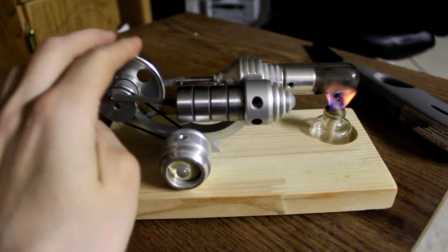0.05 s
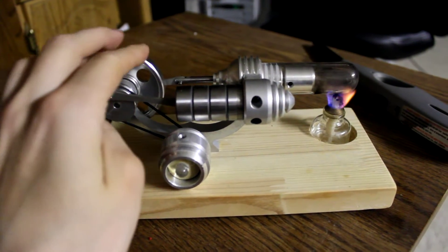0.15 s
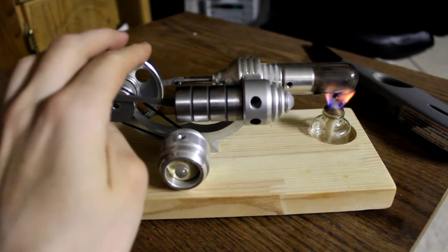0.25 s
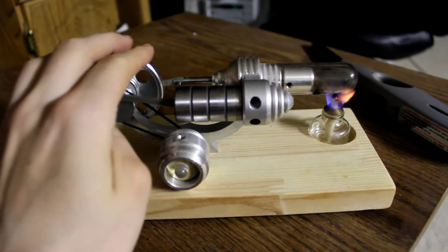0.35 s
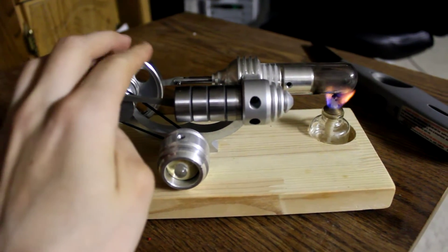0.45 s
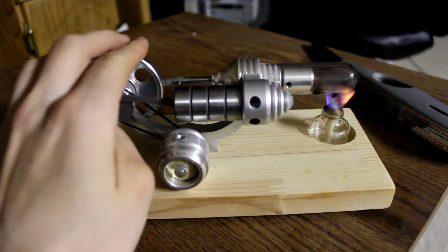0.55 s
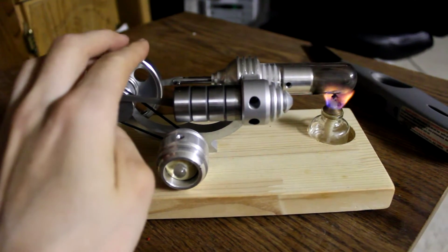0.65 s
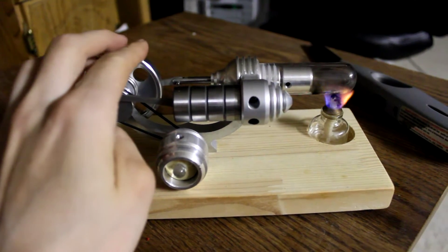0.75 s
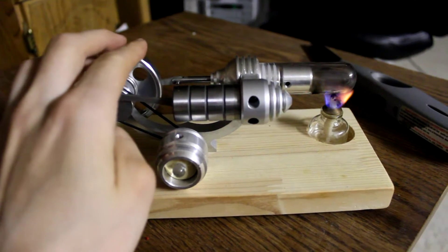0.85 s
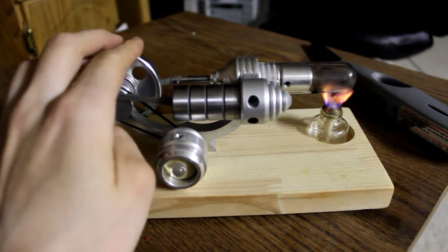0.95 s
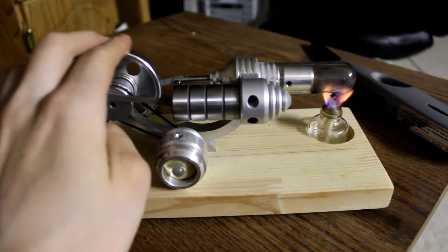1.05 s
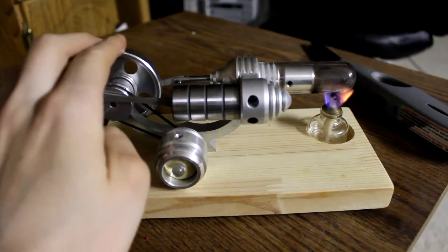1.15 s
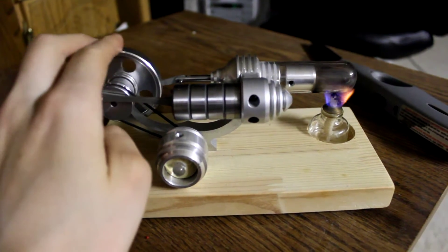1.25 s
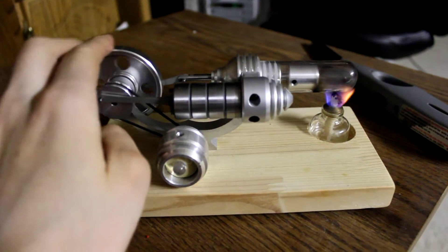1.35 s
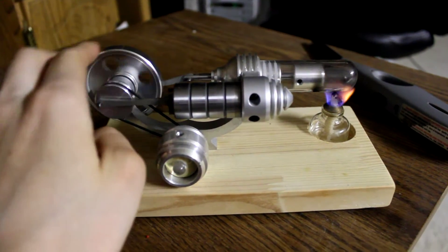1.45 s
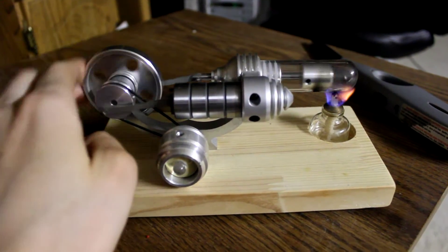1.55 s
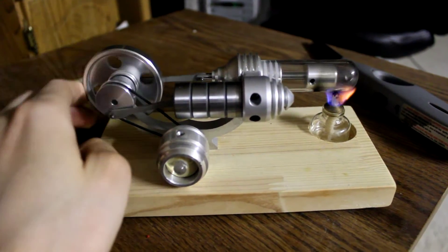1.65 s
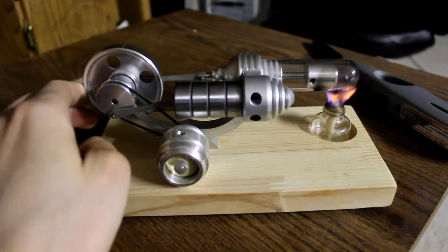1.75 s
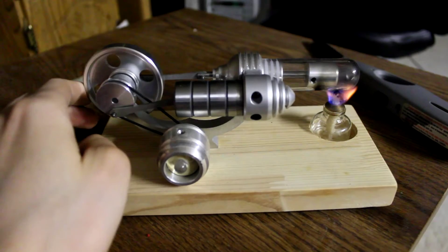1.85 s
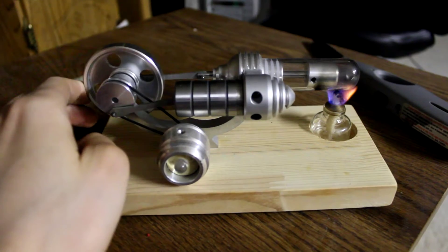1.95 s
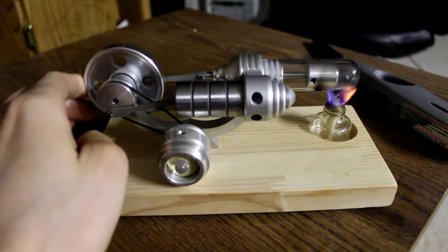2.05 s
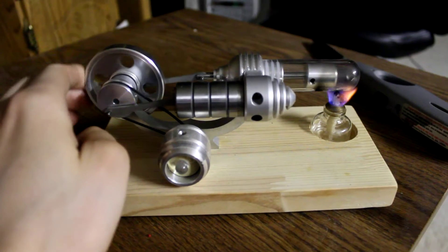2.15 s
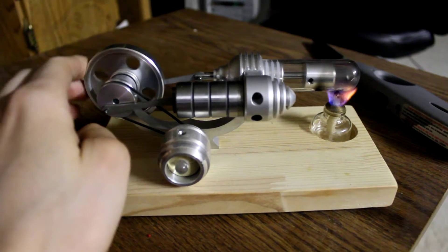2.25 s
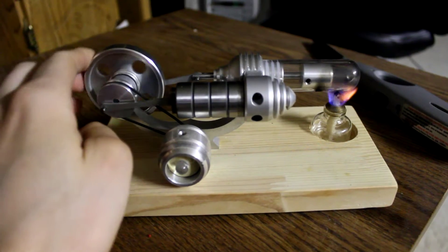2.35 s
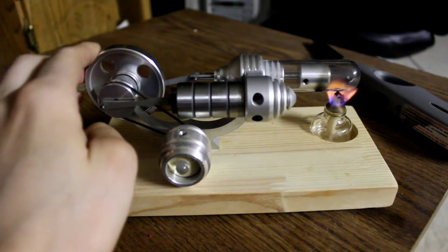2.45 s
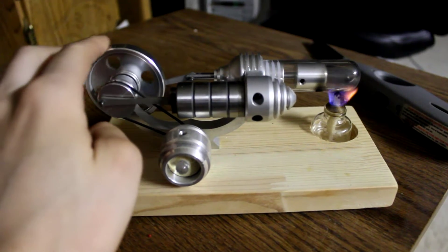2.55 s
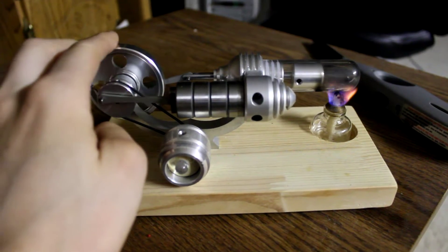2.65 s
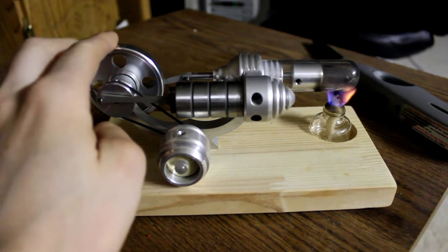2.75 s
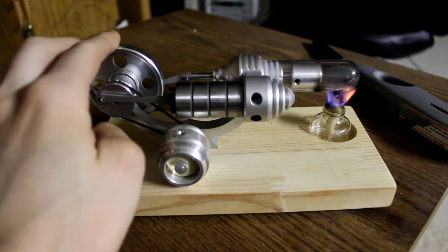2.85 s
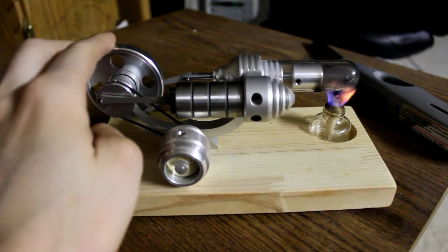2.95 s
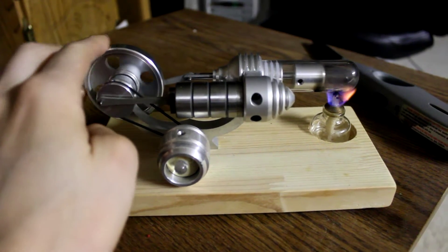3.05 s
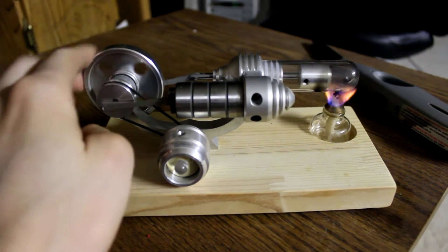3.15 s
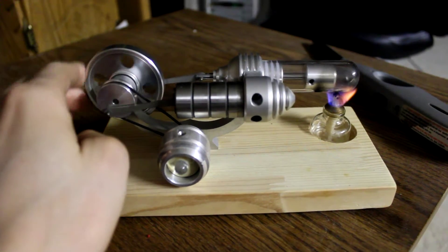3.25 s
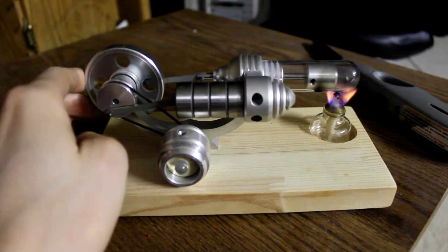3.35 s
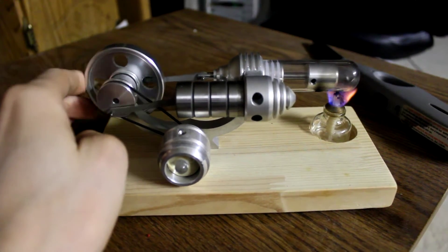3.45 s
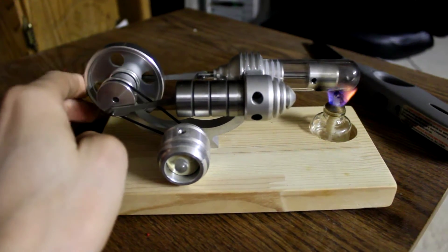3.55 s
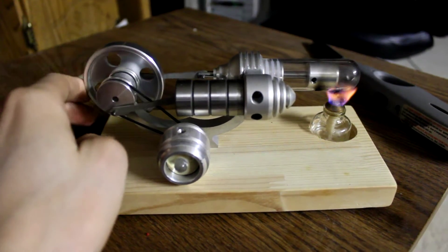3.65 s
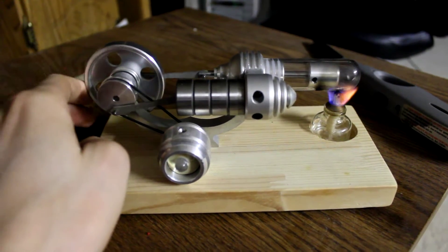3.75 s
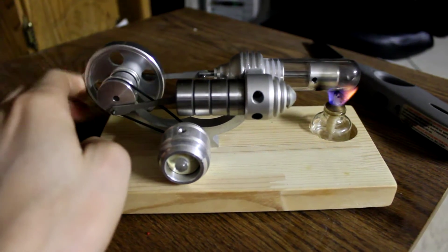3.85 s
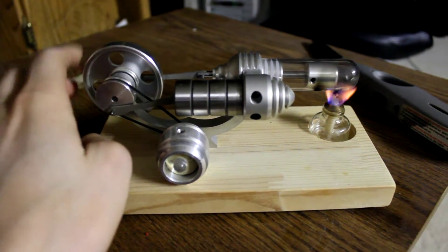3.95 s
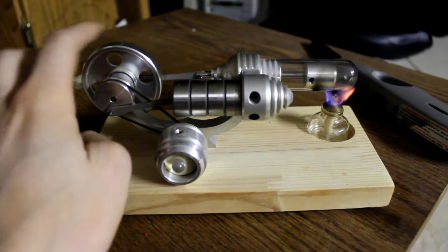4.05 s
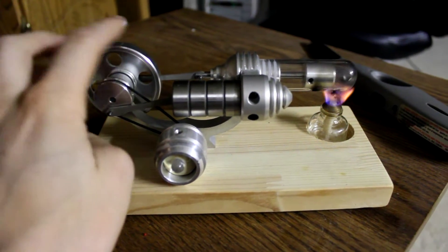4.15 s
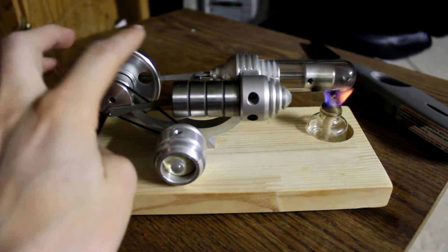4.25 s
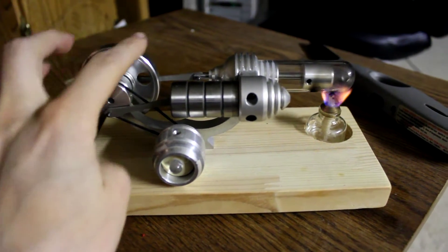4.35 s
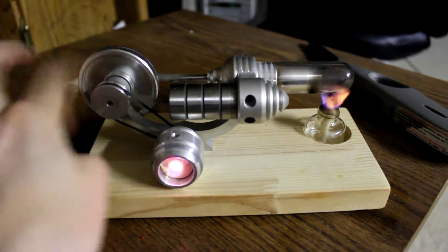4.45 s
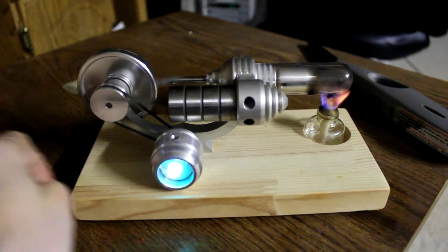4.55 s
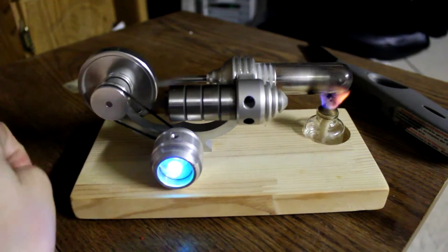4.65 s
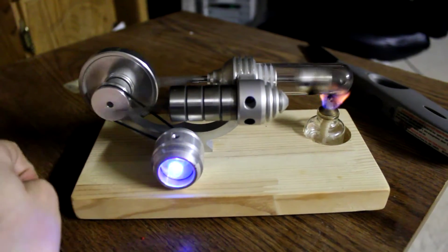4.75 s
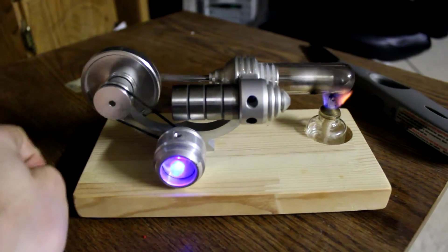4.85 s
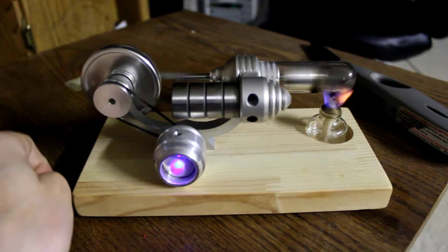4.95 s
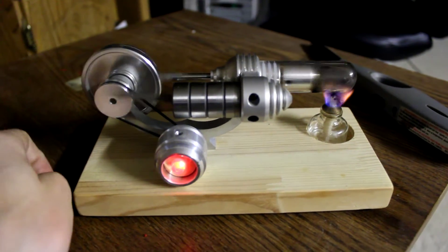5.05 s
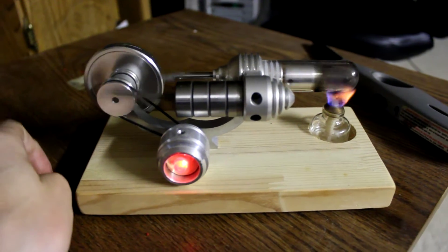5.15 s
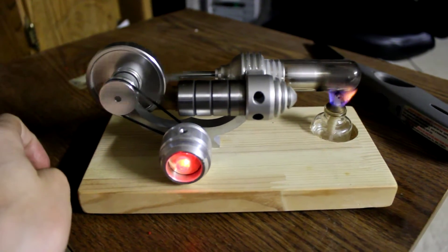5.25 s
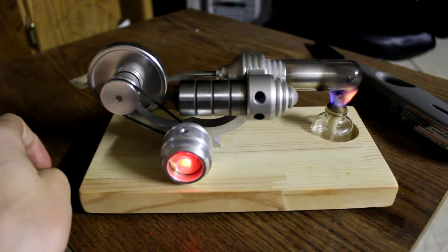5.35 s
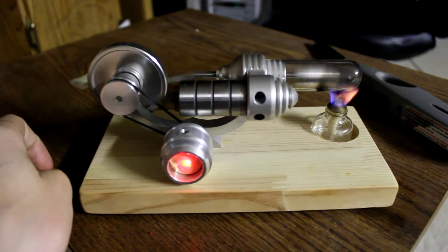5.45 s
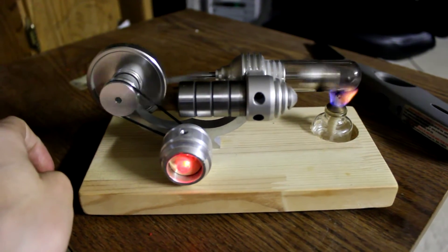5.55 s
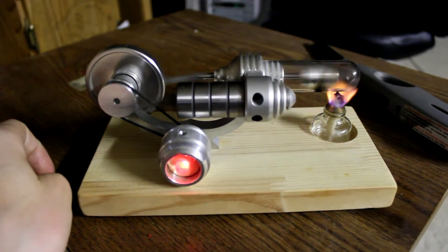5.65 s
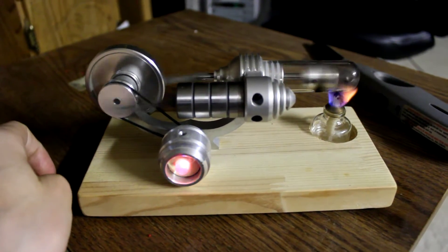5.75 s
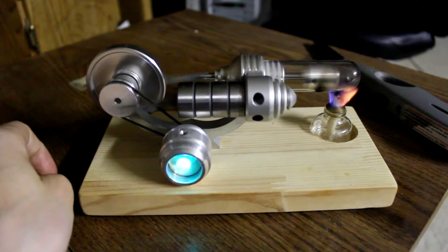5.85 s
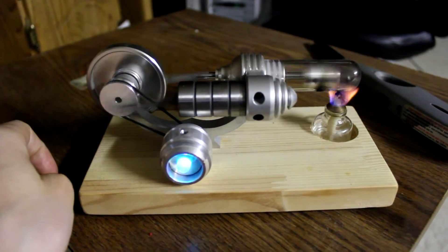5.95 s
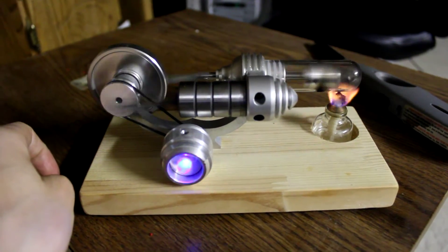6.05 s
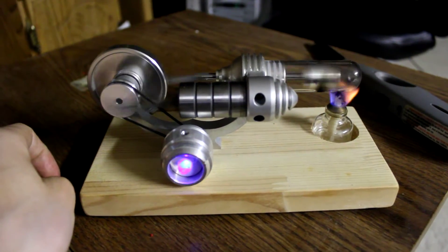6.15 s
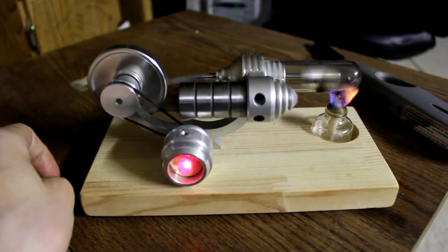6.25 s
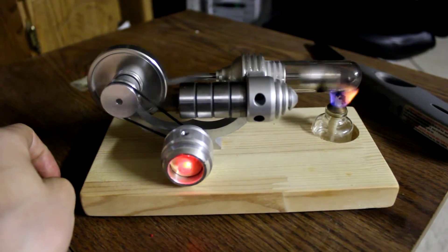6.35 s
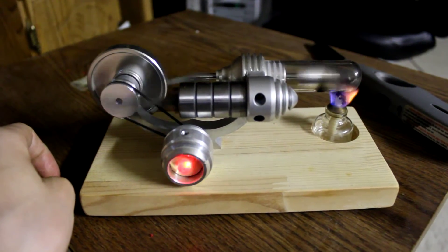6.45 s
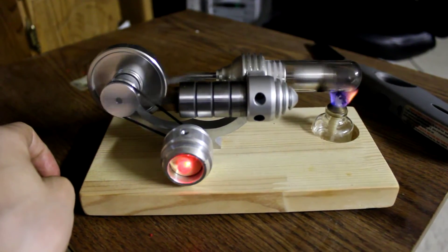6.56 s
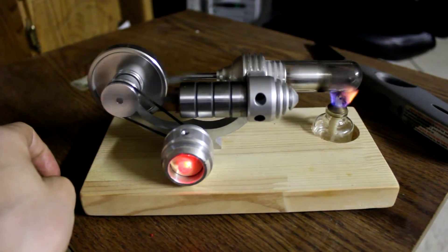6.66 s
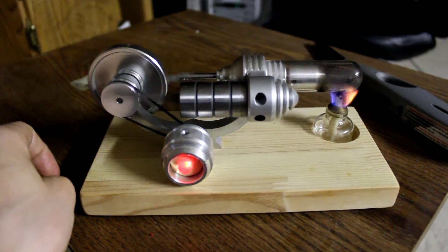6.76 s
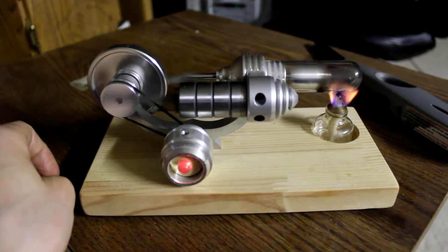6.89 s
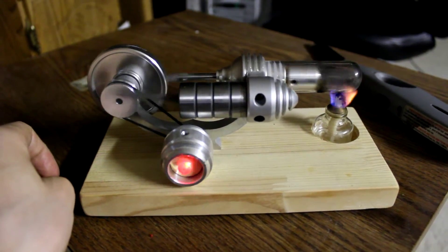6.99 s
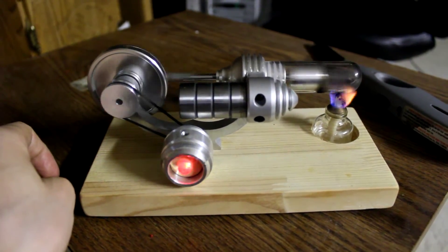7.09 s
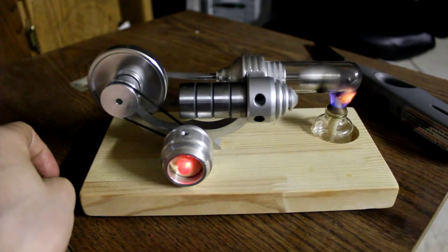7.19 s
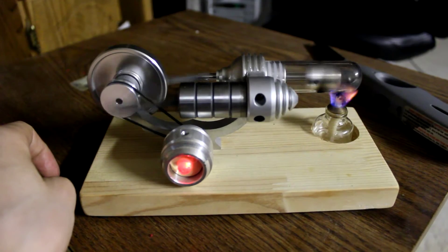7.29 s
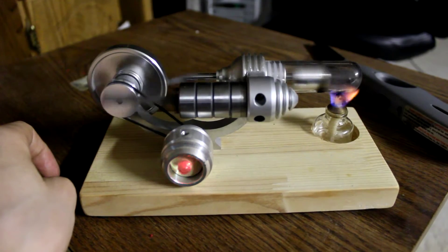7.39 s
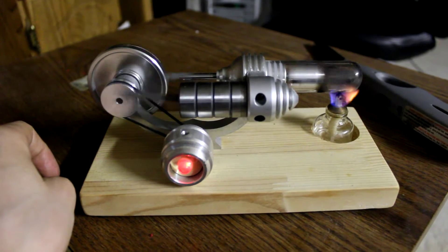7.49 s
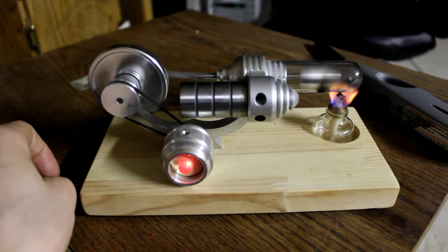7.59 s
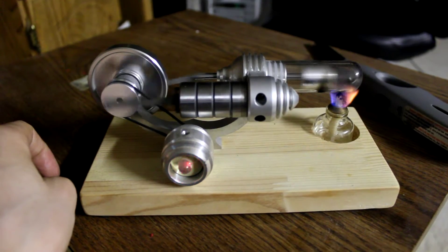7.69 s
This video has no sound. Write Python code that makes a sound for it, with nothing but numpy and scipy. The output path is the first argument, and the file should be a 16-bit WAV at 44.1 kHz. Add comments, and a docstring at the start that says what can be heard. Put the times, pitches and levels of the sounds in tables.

```python
"""A model hot-air engine

The engine stands on its wooden base on a table, in a quiet room with a faint mains hum. Fingers turn
the flywheel to and fro, so the loose linkage clicks; then a flick starts it and it runs, slowly losing
speed. The slack in the rods knocks twice a turn: hard on the forward stroke, softer but with a strong
bounce on the back stroke. The pistons slide and shake the table, and the flywheel sings thinly."""
import sys
import numpy as np
from scipy import signal
from scipy.fft import rfft, irfft
from scipy.io import wavfile
from scipy.ndimage import uniform_filter1d

SR = 44100
rng = np.random.default_rng(int(sys.argv[2]) if len(sys.argv) > 2 else 0)


def wav_record(signal):
    """Record a signal, one row per channel, as 16-bit PCM in the file named by sys.argv[1]."""
    frames = np.transpose(np.atleast_2d(signal))
    bounded = np.clip(frames, -1, 1)
    # unit amplitude maps onto the largest positive 16-bit level
    quanta = np.round(bounded * 32767).astype(np.int16)
    wavfile.write(sys.argv[1], SR, quanta)


N = 340669
TIME = np.arange(N) / SR
BLOW_SAMPLES = 4096
BLOW_HZ = np.maximum(np.fft.rfftfreq(BLOW_SAMPLES, 1 / SR), 1)
RUN_START_S, CRUISE_TURNS_PER_S = 4.5209, 10


def from_db(db):
    """Turn decibels into a gain."""
    return 10 ** (np.asarray(db) / 20)


def rms_one(x):
    """Scale a sound to an average (RMS) level of one."""
    return x / np.sqrt(np.mean(x ** 2) + 1e-20)


def at_hz(points, hz):
    """Read between rows of (Hz, value), along straight lines over log frequency."""
    where, value = np.transpose(points)
    return np.interp(np.log(np.maximum(hz, 1)), np.log(where), value)


def at_time(points, s):
    """Read between rows of (seconds, value), along straight lines."""
    return np.interp(s, *np.transpose(points))


def filtered(x, hz, kind, order=2):
    """Keep the lows, the highs or a band of a sound."""
    return signal.sosfilt(signal.butter(order, hz, kind, fs=SR, output="sos"), x)


def add(out, s, sound):
    """Lay a sound into the track at s seconds."""
    start = round(s * SR)
    out[start:start + len(sound)] += sound[:N - start]


def causal(gain):
    """A filter with these gains that makes no sound before the blow (minimum phase)."""
    cepstrum = irfft(np.log(gain))
    half = BLOW_SAMPLES // 2
    return np.exp(rfft(cepstrum * np.r_[1, 2 * np.ones(half - 1), np.zeros(half)]))


def ringing(force, modes):
    """A force sets off tones that die away."""
    t = TIME[:SR // 4]
    ring = sum(from_db(db - 60 * t / t60) * np.sin(2 * np.pi * hz * t) for hz, t60, db in modes)
    return signal.fftconvolve(force, ring)[:N]


# The tone of the room's hiss. Each row: frequency in Hz, relative level in dB.
HISS_SPECTRUM = [(25, -30), (60, -17), (110, -5), (160, -9.5), (290, -4.5), (450, -4), (650, -6),
                 (1000, -4.5), (2000, -8), (5000, -12.5), (9000, -19), (15000, -32.5)]


def still_room(hiss_db, hum_hz, hum_db):
    """An even hiss and a mains hum."""
    colour = from_db(at_hz(HISS_SPECTRUM, np.fft.rfftfreq(N, 1 / SR)))
    hiss = irfft(rfft(rng.standard_normal(N)) * colour, N)
    hum = np.sin(2 * np.pi * hum_hz * TIME)
    return from_db(hiss_db) * rms_one(hiss) + from_db(hum_db) * rms_one(hum)


# How long the room echoes. Each row: frequency in Hz, seconds to fade by 60 dB.
ECHO_FADE = [(150, 0.93), (600, 0.042), (2000, 0.12), (5000, 0.076), (13000, 0.037)]


def room_echo(x, low_db, mid_db, high_db, top_db, build_s):
    """Reflections from table and walls build up and die away; the bass lasts longest."""
    t = TIME[:SR // 2]
    edges = np.geomspace(80, 16000, 11)
    tail = 0
    for low, high in zip(edges, edges[1:]):
        hz = np.sqrt(low * high)
        envelope = from_db(-60 * t / at_hz(ECHO_FADE, hz)) * (1 - np.exp(-(t / build_s) ** 2))
        band = filtered(rng.standard_normal(len(t)) * envelope, [low, high], "band")
        echo_db = at_hz([(500, low_db), (1800, mid_db), (5000, high_db), (12000, top_db)], hz)
        tail = tail + band / np.linalg.norm(band) * np.sqrt(2 * (high - low) / SR) * from_db(echo_db)
    return signal.fftconvolve(x, tail)[:N]


# The low tones of base and table. Each row: pitch in Hz, seconds to fade by 60 dB, relative level in dB.
TABLE_TONES = [(137, 0.13, -7), (233, 0.091, -8), (291.5, 0.14, 1)]
# How hard they are shaken. Each row: time in seconds, relative level in dB.
TABLE_SHAKE = [(4.55, -45), (4.8, -42.5), (4.92, -48.5), (6.4, -46), (6.65, -49.5), (7.1, -48), (7.7, -41)]


def table_thump(thump_db, forward_db, spread_db, delay_s, push_hz, bass_hz):
    """Each stroke shoves the base against the table, the back stroke harder than the forward one."""
    pushes, run = np.zeros(N), strokes()
    for (s, back), chance in zip(run, rng.standard_normal(len(run))):
        add(pushes, s + delay_s, from_db([forward_db * (1 - back) + spread_db * chance]))
    soft_pushes = filtered(filtered(pushes, push_hz, "low"), bass_hz, "high")
    sound = ringing(soft_pushes, TABLE_TONES)
    sound = filtered(sound, 122, "high", order=8)   # the thump carries no deep bass
    return sound / np.std(sound[TIME > RUN_START_S]) * from_db(at_time(TABLE_SHAKE, TIME) + thump_db)


# Where the base and metal parts ring. Each row: pitch in Hz, width in Hz, relative level in dB.
BODY_RESONANCES = [(296.6, 53, -10.5), (564, 58.4, 2), (623, 194, -3), (922.4, 118, -3), (1032, 67, -3.5),
                   (1255, 103, -2), (1406, 65, -16), (1487, 770, -7), (1770, 430, -4.5), (1820, 100, -15),
                   (2176, 183, 0), (2314, 31, -4.5), (2740, 230, -14.5), (3220, 1200, -16),
                   (3738, 270, 3.5), (3950, 870, -1), (4975, 530, -0.5), (5390, 140, -4), (5830, 720, -8),
                   (6990, 630, -5.5), (8060, 1000, -18.5), (10080, 1500, -19), (11400, 8400, -30),
                   (14070, 590, -22.5)]


def body(damping=1, spread_db=0):
    """The engine's body as a filter; spread_db lets each contact ring it a little differently."""
    strengths = from_db(spread_db * rng.standard_normal(len(BODY_RESONANCES)))
    power = sum((from_db(db) * strength) ** 2 / (1 + (2 * (BLOW_HZ - hz) / (width * damping)) ** 2) ** 2
                for (hz, width, db), strength in zip(BODY_RESONANCES, strengths))
    return causal(np.sqrt(power))


def through_body(x):
    """A rubbing force, heard through the engine's body."""
    return signal.fftconvolve(x, irfft(body()))[:N]


# Fingers rolling the wheel. Each row: peak time in seconds, level in dB, rise and fall in seconds.
FINGER_SCUFFS = [(0.353, -40, 0.0071, 0.0085), (1.051, -44, 0.011, 0.044), (2.08, -58, 0.054, 0.02),
                 (3.048, -41, 0.0077, 0.042), (3.255, -58, 0.017, 0.054), (3.879, -41, 0.011, 0.019),
                 (4.063, -46.5, 0.017, 0.023)]


def finger_scuffs(dull_hz):
    """Skin drags on the rim: short, dull swells of friction."""
    rubbing = through_body(rng.standard_normal(N))
    dull = filtered(filtered(rubbing, dull_hz, "low"), dull_hz, "low")
    swells = sum(from_db(db) * np.exp(-np.maximum((s - TIME) / rise, (TIME - s) / fall))
                 for s, db, rise, fall in FINGER_SCUFFS)
    return rms_one(dull) * swells


def piston_slide(cruise_db, db_per_speed, swing_db, grain_db, lag_rad, onset_s):
    """Gritty friction that grows with speed and swells and fades with each stroke."""
    grit = rng.standard_normal(N) * from_db(grain_db * np.minimum(rng.exponential(1, N), 6))
    db = cruise_db + at_time(ENGINE_EFFORT, TIME) + db_per_speed * (speed(TIME) - CRUISE_TURNS_PER_S)
    db += swing_db * np.cos(stroke_angle() - lag_rad)
    fade_in = np.clip((TIME - FLICK_KNOCKS[0][0]) / onset_s, 0, 1) ** 2
    return rms_one(through_body(grit)) * from_db(db) * fade_in


# The wheel's ring swells and fades. Each row: time in seconds, relative level in dB.
WHEEL_SWELL = [(4.55, -13), (4.92, 1.5), (5.3, -2), (5.78, 3), (6.2, -1.5), (6.69, -1), (6.87, 4.5),
               (7.15, -12), (7.7, 5)]
# Fingers catch the rim and set it singing. Each row: start in seconds, level in dB.
WHEEL_TOUCHES = [(0.1, -59), (3.88, -53)]


def flywheel_ring(shaking, hz, t60_s, sing_db, lag_rad):
    """The wheel stores the blows' energy and rings; its still spots sweep past, so the tone throbs."""
    decay, step = from_db(-60 / (t60_s * SR)), 2 * np.pi * hz / SR
    ring = signal.lfilter([np.sin(step)], [1, -2 * decay * np.cos(step), decay ** 2], shaking + 1e-18)
    even_tone = ring / np.sqrt(np.abs(uniform_filter1d(ring ** 2, size=8000)) + 1e-6)
    drive = shaking * from_db(at_time(WHEEL_SWELL, TIME) + sing_db) * (TIME > FLICK_KNOCKS[0][0])
    energy_in = (1 - decay ** 2) * drive ** 2
    for s, db in WHEEL_TOUCHES:
        add(energy_in, s, from_db([db]) ** 2)
    stored = signal.lfilter([1], [1, -decay ** 2], energy_in)
    return even_tone * np.sqrt(stored) * np.cos(stroke_angle() - lag_rad)


# The five parts of a blow: base, frame, rods, pins and bright tick. Each row: lowest and highest Hz.
PART_BANDS = [(450, 2400), (3200, 4400), (4600, 6200), (6500, 8000), (9000, 15000)]


def blows(rows, chatter_db, fall_power, snap_hz, chatter_hz, repeat_share, damping, spread_db,
          base_db, base_tilt_db, metal_db, top_db):
    """Each blow is a dull snap and a brief, bright chatter in the joint, ringing through the body."""
    out = np.zeros(N)
    patterns = rng.standard_normal((2, BLOW_SAMPLES))
    fresh = rng.standard_normal((len(rows), BLOW_SAMPLES))
    snap = 1 / (1 + 1j * BLOW_HZ / snap_hz)
    hardness_db = at_hz([(11500, 0), (14200, top_db)], BLOW_HZ)
    for k, (s, contact_s, *parts_db) in enumerate(rows):
        age = TIME[:BLOW_SAMPLES] / contact_s
        # each stroke direction partly repeats its own pattern of chatter
        contacts = np.sqrt(repeat_share) * patterns[k % 2] + np.sqrt(1 - repeat_share) * fresh[k]
        chatter = filtered(contacts * age / (1 + age ** fall_power), chatter_hz, "high")
        force = snap + from_db(chatter_db) * rfft(chatter) / np.linalg.norm(chatter)
        blow = body(damping, spread_db) * force
        # where the blow lands decides how much of it goes into each part
        held = [np.linalg.norm(blow[(BLOW_HZ > low) & (BLOW_HZ < high)]) / BLOW_SAMPLES
                for low, high in PART_BANDS]
        gains_db = np.array(parts_db) - 20 * np.log10(held) + np.r_[base_db, [metal_db] * 4]
        points = [(hz, db) for band, db in zip(PART_BANDS, gains_db) for hz in band]
        points[1] = (points[1][0], gains_db[0] + base_tilt_db)   # upper edge of the base's range
        balance = causal(from_db(at_hz(points, BLOW_HZ) + hardness_db))
        add(out, s, irfft(blow * balance))
    return filtered(out, 305, "high")


# The crank's tones. Each row: pitch in Hz, seconds to fade by 60 dB, relative level in dB.
CRANK_TONES = [(1596, 0.1, -10), (1740, 0.076, -0.5), (3660, .09, -5), (4940, 0.068, -9), (5220, 0.074, -2),
               (10300, 0.097, 1)]


def crank_ping(clicks, ping_db):
    """The metal crank rings on briefly after a click."""
    return rms_one(ringing(clicks, CRANK_TONES)) * np.std(clicks) * from_db(ping_db)


# Clicks under the hand. Each row: start and contact length in seconds, relative level in the frame
# in dB, then extra dB in the wooden base, the rods and the bright tick.
HAND_CLICKS = [(0.152, 0.0013, -61, 8, 9, -9), (0.1743, 0.0039, -53, 4.5, 0, -5),
               (0.3488, 0.0015, -52, -3, 2, -19), (0.4661, 0.0031, -64.5, 5, 7, -5),
               (0.5967, 0.0013, -61, 6, -3, -3), (0.9983, 0.00089, -59, 14, 5, -20),
               (1.0658, 0.00075, -34.5, 0.5, -2.5, -12), (1.264, 0.00078, -64, 3, 2, 0),
               (1.4133, 0.001, -42.5, -2.5, -0.5, -11), (1.6631, 0.0056, -60, 4, 11, -10),
               (1.702, 0.0015, -62, -9, 6, -11), (1.8535, 0.00092, -60.5, -2, 9, -12),
               (2.0946, 0.00055, -46, 4, 5, -8), (2.4116, 0.004, -59, -5, 1, 0),
               (2.7954, 0.00057, -53.5, 5, 7, 0), (2.8232, 0.0031, -61, 11, 9, -17),
               (2.9274, 0.00089, -47.5, 6, 7.5, -6), (3.2093, 0.0016, -37, -3.5, 6, -4.5),
               (3.2464, 0.0072, -53, 1, 10, -4), (3.258, 0.0011, -39.5, 0, 4, -1),
               (3.4715, 0.0012, -54, 4, -2, -19), (3.8246, 0.0013, -57.5, 4, 4, -17),
               (3.8797, 0.0023, -45, 4, 0.5, -15.5), (4.3456, 0.0055, -46, 8, 2, -20),
               (4.3518, 0.0048, -47, -6, -8, -12), (4.396, 0.0036, -41, -2, -2, -12)]


def hand_clicks(pins_db):
    """The linkage takes up its slack; each click is more wooden, more ringing or brighter."""
    rows = [(s, contact_s, db + wood_db, db, db + rods_db, db + pins_db, db + tick_db)
            for s, contact_s, db, wood_db, rods_db, tick_db in HAND_CLICKS]
    return blows(rows, chatter_db=10.5, fall_power=2.84, snap_hz=3000, chatter_hz=1160,
                 repeat_share=0.24, damping=1, spread_db=3.5,
                 base_db=-11, base_tilt_db=-4, metal_db=-13, top_db=-15)


# The flywheel's speed. Each row: time in seconds, turns per second.
WHEEL_SPEED = [(4.52, 12.264), (4.85, 11.974), (5.2, 10.825), (5.38, 10.856), (5.66, 10.216), (6.36, 9.655),
               (6.47, 9.355), (6.68, 9.238), (6.79, 8.199), (7.03, 8.364), (7.15, 7.939), (7.28, 7.938),
               (7.41, 6.991), (7.55, 7.695)]


def speed(s):
    """Turns per second at time s."""
    return at_time(WHEEL_SPEED, s)


# The uneven beat. Each row: time in seconds, share of a turn from forward knock to back knock.
BACK_STROKE_SHARE = [(4.52, 0.304), (4.77, 0.406), (5.02, 0.45), (5.47, 0.499), (6.06, 0.5), (6.47, 0.513),
                     (6.68, 0.525), (6.79, 0.534), (7.15, 0.526), (7.55, 0.551)]


def strokes():
    """The pistons reverse twice a turn. Each row: time in seconds, 0 for forward or 1 for back."""
    rows, s = [], RUN_START_S
    while s < TIME[-1]:
        turn_s = 1 / speed(s)
        rows += [(s, 0), (s + turn_s * at_time(BACK_STROKE_SHARE, s), 1)]
        s += turn_s
    return [row for row in rows if row[0] < TIME[-1]]


def stroke_angle():
    """The stroke cycle in radians: it comes round once per knock, twice per turn of the wheel."""
    times = [row[0] for row in FLICK_KNOCKS + strokes()]
    return 2 * np.pi * np.interp(TIME, times, np.arange(len(times)))


# The bounce after the forward knock, then after the back knock.
# Each row: delay in seconds at cruising speed, then relative dB in each of the five parts.
ROD_BOUNCES = [(0.0128, -45.5, -45, -37.5, -34, -53.5), (0.0128, -30, -29.5, -26.5, -31.5, -40.5)]


def rod_bounces(contact_s, jitter_s, spread_db, delay_power, db_per_speed):
    """The rod bounces once in its joint; the forward bounce gets later and weaker as the wheel slows."""
    rows, run = [], strokes()
    for (s, back), (late, *chance) in zip(run, rng.standard_normal((len(run), 1 + len(PART_BANDS)))):
        delay_s, *parts_db = ROD_BOUNCES[back]
        db = at_time(ENGINE_EFFORT, s) + spread_db * np.array(chance)
        if not back:
            delay_s *= (CRUISE_TURNS_PER_S / speed(s)) ** delay_power
            db += db_per_speed * (speed(s) - CRUISE_TURNS_PER_S)
        rows.append((s + delay_s + jitter_s * late, contact_s, *(parts_db + db)))
    return blows(rows, chatter_db=5, fall_power=5, snap_hz=2500, chatter_hz=1840,
                 repeat_share=0.45, damping=0.93, spread_db=2,
                 base_db=-16, base_tilt_db=0, metal_db=-13, top_db=1)


# Knocks as a finger flicks the wheel up to speed.
# Each row: start and contact length in seconds, then relative dB in each of the five parts.
FLICK_KNOCKS = [(4.4066, 0.0026, -30.5, -33, -31.5, -39.5, -45),
                (4.4421, 0.00099, -26.5, -29.5, -17.5, -36, -34),
                (4.487, 0.00055, -22, -13.5, -17.5, -21.5, -29.5)]
# The forward knock, then the back knock.
# Each row: usual contact length in seconds, then relative dB in each of the five parts.
STROKE_KNOCKS = [(0.0013, -24.5, -24, -22, -28.5, -33), (0.0018, -27.5, -23.5, -25.5, -30.5, -39)]
# How hard the engine works. Each row: time in seconds, extra level in dB.
ENGINE_EFFORT = [(4.52, 3), (4.72, 0.3), (5.1, 0), (5.5, -2), (5.65, 0.5), (6.4, 1.5), (6.7, -0.6),
                 (6.9, 1.4), (7.13, -4.5), (7.4, -0.2), (7.7, -0.4)]
# Strokes that hit the full slack. Each row: time in seconds, extra dB, further dB in the frame.
HARD_KNOCKS = [(4.85, 1.5, 4.5), (5.197, 2, 5.5), (5.38, 0.5, 5.5), (6.262, 0.5, 6), (6.575, 1.5, 1.5),
               (6.791, 2.5, 1), (6.913, 2, 3.5), (7.035, 3, 7.5), (7.405, 0.5, 5.5), (7.548, 2.5, 1)]


def rod_knocks(spread_db, stretch_power, length_spread_db, hard_length_share):
    """The flick, then a knock at each reversal; hard ones are shorter and ring the frame most."""
    run = strokes()
    times = np.array([s for s, _ in run])
    extra_db = spread_db * rng.standard_normal((len(run), len(PART_BANDS)))
    stretch = (CRUISE_TURNS_PER_S / speed(times)) ** stretch_power   # a slow wheel drags the contact out
    stretch *= from_db(length_spread_db * rng.standard_normal(len(run)))
    for s, db, frame_db in HARD_KNOCKS:
        nearest = np.argmin(abs(times - s))
        extra_db[nearest] = db + np.r_[0, frame_db, 0, 0, 0]
        stretch[nearest] *= hard_length_share
    rows = list(FLICK_KNOCKS)
    for (s, back), extra, longer in zip(run, extra_db, stretch):
        contact_s, *parts_db = STROKE_KNOCKS[back]
        rows.append((s, contact_s * longer, *(parts_db + extra + at_time(ENGINE_EFFORT, s))))
    return blows(rows, chatter_db=6.5, fall_power=2.68, snap_hz=3100, chatter_hz=2200,
                 repeat_share=0.51, damping=0.84, spread_db=1.5,
                 base_db=-12.5, base_tilt_db=0.1, metal_db=-12.5, top_db=2)


def scene():
    """Clicks and scuffs under the hand, then the running clatter, in a quiet room."""
    clicks = hand_clicks(pins_db=-9)
    knocks = rod_knocks(spread_db=1.36, stretch_power=1.37, length_spread_db=2.5, hard_length_share=0.83)
    bounces = rod_bounces(contact_s=0.0024, jitter_s=0.0007, spread_db=4.5,
                          delay_power=0.9, db_per_speed=1.7)
    struck = clicks + crank_ping(clicks, ping_db=-14.5) + knocks + bounces
    scuffs = finger_scuffs(dull_hz=2430)
    slide = piston_slide(cruise_db=-38, db_per_speed=1.5, swing_db=7.5, grain_db=4.5,
                         lag_rad=1.08, onset_s=0.12)
    singing = flywheel_ring(struck, hz=5917, t60_s=0.89, sing_db=-16, lag_rad=5.25)
    engine = struck + scuffs + slide + singing
    thump = table_thump(thump_db=-1, forward_db=-6, spread_db=1.5, delay_s=0.00648,
                        push_hz=386, bass_hz=183)
    echo = room_echo(engine, low_db=-21, mid_db=-4, high_db=-18, top_db=-17.5, build_s=0.0064)
    background = still_room(hiss_db=-55, hum_hz=121.2, hum_db=-67.5)
    return (engine + echo + thump + background)[None]


def record(dry):
    """The tallest peaks are rounded and the highest treble is cut."""
    rounded = 1.5 * np.tanh(dry / 1.5)
    return filtered(rounded, 15500, "low", order=30)


dry = scene()
out = record(dry)
wav_record(out)
```